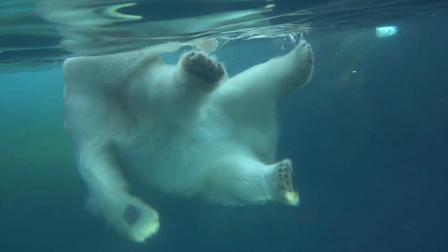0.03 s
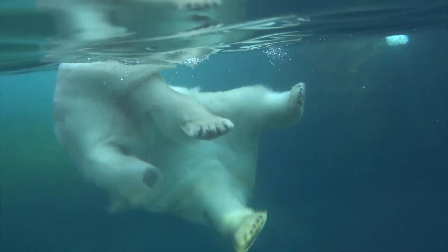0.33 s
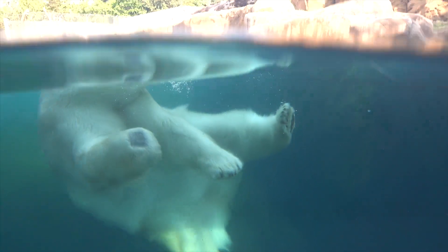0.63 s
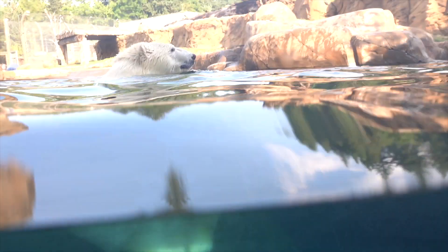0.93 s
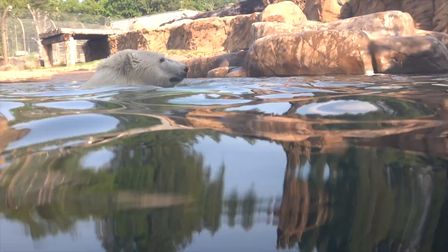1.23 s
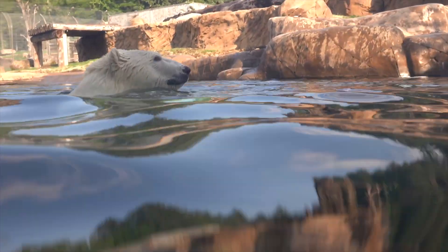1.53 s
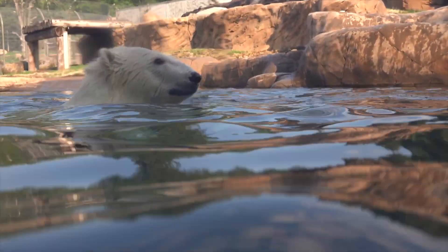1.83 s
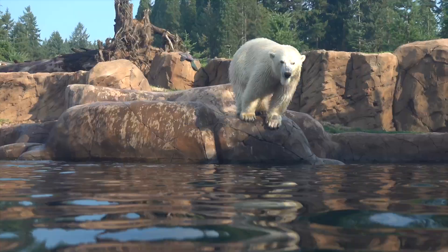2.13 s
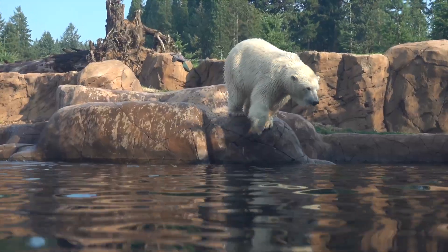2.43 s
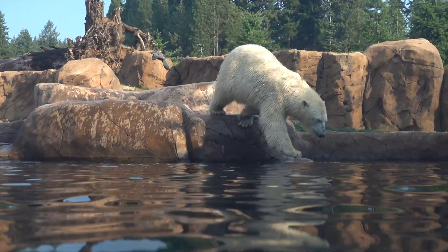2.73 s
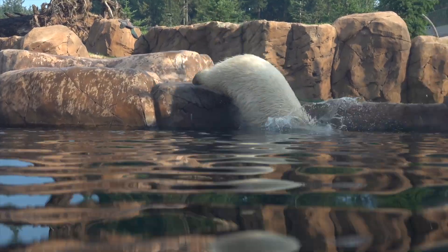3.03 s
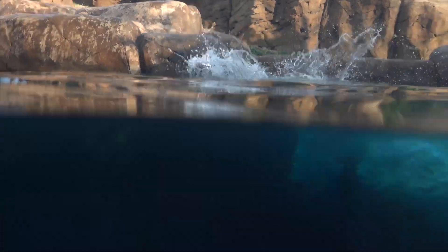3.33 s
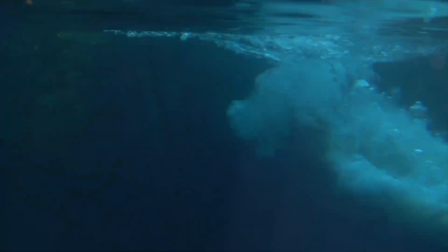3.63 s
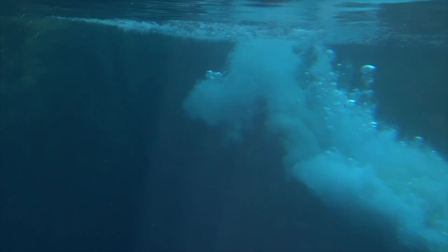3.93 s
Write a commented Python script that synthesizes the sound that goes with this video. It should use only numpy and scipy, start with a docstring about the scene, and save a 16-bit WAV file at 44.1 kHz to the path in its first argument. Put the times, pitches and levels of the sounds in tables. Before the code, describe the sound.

Water bubbles and splashes around a polar bear, heard at a pool's waterline. Soft underwater paddling with small pops fills the first second, leaving a dull, hollow wash. The bear blows faintly around 1.6 seconds, and the microphone housing knocks at 2.1. From 2.9 the bear plunges in: a drop ticks sharply at 3.1, then gulping bubbles, churn, fizz and spray surge, loudest around 3.7.

```python
"""Bubbly underwater paddling over the dull, hollow wash of a zoo pool, heard from inside a waterproof
housing at the waterline. A polar bear swims, surfaces and blows; bubbles pop and droplets tick.
The housing rings briefly twice, from a knock and from a hard drop. The bear dives in from the rocks:
surges of gulping air, churn, fizz and falling spray, each a cloud of ringing bubbles over noise."""
import sys
import numpy as np
from scipy import signal
from scipy.fft import rfft, irfft
from scipy.io import wavfile

SR = 44100
rng = np.random.default_rng(int(sys.argv[2]) if len(sys.argv) > 2 else 0)


def to_wav(sig):
    """Store sig (one row per channel, or 1-D mono) as 16-bit WAV at the path in sys.argv[1].

    Samples outside -1..1 are clipped; the rate is SR.
    """
    pcm = np.clip(np.atleast_2d(sig), -1, 1) * 32767
    pcm = np.round(pcm).astype(np.int16)
    wavfile.write(sys.argv[1], SR, pcm.T)  # frames by channels


N = 176400
T = np.arange(N) / SR
CUTOFF_HZ = 15700

# fine spray spectrum: freq_hz, density_db
SPRAY_SPECTRUM = [(2500, -25), (5000, -2.5), (6400, 0), (7700, -2.5), (10000, -2), (12800, 1), (14200, -7),
                  (16000, -16)]


def dive():
    """Each surge drives big gulps of air, churning bubbles, fizz and spray; surge powers add."""
    # forepaws, body, hind legs, slap, backwash, cavity closing, water falling back:
    # start_s, rise_s, fade_db_per_s, gulp_db, churn_db, fizz_db, spray_db
    surges = [(2.87, 0.11, 32, -60.5, -52, -58, -74), (2.97, 0.14, 25, -67, -58, -67, -61),
              (3.115, 0.067, 90, -51, -47, -57, -63), (3.25, 0.04, 33, -56, -47, -54, -57.5),
              (3.348, 0.013, 37, -57, -46.5, -48.5, -57.5), (3.42, 0.13, 13, -70, -55, -48.5, -58.5),
              (3.57, .052, 56, -46, -37.4, -43, -51), (3.66, 0.082, 79, -61, -46, -44.5, -47.5)]
    # large, medium and small bubbles: freq_hz, density_db
    gulp_spectrum = [(30, -56), (100, -13.5), (190, -5), (270, -1.5), (380, 3.5), (520, -4.5), (900, -35)]
    churn_spectrum = [(250, -41), (480, -7.5), (660, -1), (900, -2.5), (1150, -6.5), (1350, -7.5),
                      (1600, -12), (2100, -23), (4000, -43)]
    fizz_spectrum = [(800, -33), (1500, -0.5), (2300, 0), (3000, -4), (4300, -5), (5300, -13.5),
                     (8000, -14), (16000, -42)]
    # water parting round the chest: freq_hz, density_db
    entry_spectrum = [(700, -16), (1200, 0.5), (1800, 2), (2500, -4), (4000, -22), (6600, -28),
                      (7400, -7.5), (8300, -13), (10000, -15), (13000, -21), (16000, -36)]
    power = sum((from_db(levels_db)[:, None] * burst(start_s, rise_s, fade_db_per_s)) ** 2
                for start_s, rise_s, fade_db_per_s, *levels_db in surges)
    gulp, churn, fizz, spray = np.sqrt(power)
    gulp = gulp * bubbles(gulp_spectrum, 131, 467, per_s=300, cycles=9.9,
                          share=.5, flutter_db=.5, pan_db=-.7)
    churn = churn * bubbles(churn_spectrum, 477, 1830, per_s=900, cycles=12,
                            share=.51, flutter_db=.7, pan_db=-2)
    fizz = fizz * bubbles(fizz_spectrum, 1420, 5400, per_s=2000, cycles=12,
                          share=.54, flutter_db=.8, pan_db=1.5)
    spray = spray * bubbles(SPRAY_SPECTRUM, 4600, 15000, per_s=2500, cycles=5,
                            share=.44, flutter_db=.1, pan_db=1)
    entry = from_db(-54.5) * burst(2.87, rise_s=.09, fade_db_per_s=19) * wash(entry_spectrum, pan_db=1.5)
    slap = from_db(-48) * burst(3.356, rise_s=.005, fade_db_per_s=80) * hollow(2340, width_hz=340)
    return gulp + churn + fizz + spray + entry + slap


def spurts():
    """Sheets of water thrown up by the dive break into short showers."""
    # showers: start_s, level_db
    showers = [(2.886, -64), (2.948, -61.5), (3.03, -63), (3.165, -62), (3.273, -58), (3.356, -52),
               (3.74, -44), (3.97, -55)]
    # shower spectrum: freq_hz, density_db
    spectrum = [(1200, -20), (2500, 4), (4300, 2), (6400, -5), (7700, -1), (10000, -4), (13000, -2),
                (16000, -18)]
    flow = sum(from_db(db) * burst(start_s, rise_s=.006, fade_db_per_s=260) for start_s, db in showers)
    return flow * bubbles(spectrum, 2200, 15000, per_s=2500, cycles=6, share=.52, flutter_db=1, pan_db=4)


def paddling():
    """Paws under water stir bubbles, raise a hollow swirl and shed air."""
    # stroke strength: time_s, level_db
    strokes = [(0, -52), (.15, -52.5), (.31, -48.5), (.5, -49.5), (.68, -51.5), (.88, -51.5), (.97, -62),
               (1.1, -82)]
    # stirred bubbles and shed air: freq_hz, density_db
    stir_spectrum = [(30, -38), (60, -22), (130, -9), (220, -2), (480, -2), (780, 3.5), (1100, -1),
                     (1450, -9), (2200, -14.5), (3200, -23), (4700, -41), (12000, -60)]
    air_spectrum = [(900, -22), (1800, 5), (3000, 0), (4700, -19), (6000, -9), (7400, -9), (8800, -23),
                    (15000, -22)]
    stir = level(strokes) * bubbles(stir_spectrum, 142, 2770, per_s=1600, cycles=13,
                                    share=.27, flutter_db=0, pan_db=-1)
    swirl = from_db(-51.5) * swell(.084, width_s=.073) * hollow(790, width_hz=330)
    air = from_db(-65) * swell(.33, width_s=.16) * wash(air_spectrum)
    return stir + swirl + air


def blow():
    """The bear blows through its nose: a narrow band of air noise."""
    # breath spectrum: freq_hz, density_db
    spectrum = [(1100, -38), (1530, -20), (1740, 2), (2000, -7.5), (2400, -28.5), (4000, -26), (6000, -44)]
    return from_db(-60) * burst(1.39, rise_s=.25, fade_db_per_s=33) * wash(spectrum, pan_db=9.5)


def knock(start_s=2.0882, rub_s=.0008):
    """A hit and a gritty rub ring the housing, which rattles and settles with a low thump."""
    # housing modes: freq_hz, gain_db, t60_s, pan_db
    modes = [(1070, -8, .02, -2), (1650, -9.5, 0.023, -7), (2370, -7, 0.0078, -6), (3270, 1.5, .0055, -7.5),
             (5560, -10, 0.0018, -6), (7970, 1, 0.0046, -2), (10500, -2.5, 0.0027, -3),
             (12200, -3, .002, 1)]
    # settling thump: freq_hz, density_db
    thump_spectrum = [(15, -16), (40, -5), (150, -2), (350, 0), (700, -20), (2000, -50)]
    grit = rng.standard_normal((2, N)) * swell(start_s + rub_s, rub_s)
    grit /= np.sqrt(np.sum(grit ** 2, axis=1, keepdims=True))   # unit energy, like the click
    force = click(start_s) + from_db(6) * spread(grit)
    tick = from_db(-31) * strike(force, modes, low_hz=700, high_hz=CUTOFF_HZ)
    rattle = from_db(-51) * burst(start_s, rise_s=.008, fade_db_per_s=750) * hollow(3370, width_hz=1000)
    settling = from_db(-57) * burst(2.098, rise_s=.0033, fade_db_per_s=1100)
    return tick + rattle * pan(-3) + settling * wash(thump_spectrum, pan_db=-2.5)


def drop(start_s=3.1036):
    """A hard drop hits the housing with a sharp tick and shatters into spray."""
    # wall modes: freq_hz, gain_db, t60_s, pan_db
    wall_modes = [(2950, -12, 0.0055, 3), (3670, -15.5, .004, 9), (5600, -14, 0.0026, 2),
                  (7300, -5, 0.0021, 6), (8600, -6, .003, 4), (9500, -38, 0.032, 0),
                  (10540, 1.5, 0.0023, -1), (13400, -4, .0015, 0)]
    # wall antiresonances: freq_hz, width_hz
    notches = [(4400, 1200), (9450, 170)]
    # brief, faint low bump of pool water under the tick: freq_hz, level_db, t60_s
    bump_tones = [(215, -45, 0.04), (780, -32, .012)]
    hit = click(start_s)
    tick = strike(hit, wall_modes, low_hz=2510, high_hz=13600)
    for hz, width_hz in notches:
        tick = signal.lfilter(*signal.iirnotch(hz, hz / width_hz, fs=SR), tick)
    water_bump = sum(from_db(db) * ring(hit, hz, t60_s) for hz, db, t60_s in bump_tones)
    shatter = from_db(-36.5) * burst(start_s, rise_s=.0011, fade_db_per_s=2800) * wash(SPRAY_SPECTRUM)
    return from_db(-5) * lag_left(tick, lag_s=7e-6) + water_bump + shatter


def surfacing():
    """Bubbles burst and water gurgles as the housing rises."""
    # bursting bubbles: start_s, pitch_hz, level_db
    bursts = [(.652, 1900, -56), (.803, 1750, -55.5), (.886, 1950, -55), (.918, 1730, -50.5)]
    pops = sum(from_db(db) * burst(start_s, rise_s=.002, fade_db_per_s=900) * hollow(hz, width_hz=650)
               for start_s, hz, db in bursts)
    gurgle = from_db(-60) * swell(.75, width_s=.08) * hollow(170, width_hz=165)
    return pops + gurgle


def drips():
    """Droplets tick faintly on the housing as it bobs at the waterline."""
    # droplets: start_s, pitch_hz, level_db
    droplets = [(.609, 4000, -67), (.649, 4800, -66), (.885, 10500, -69), (.928, 7000, -66),
                (1.518, 11000, -68), (1.612, 4000, -66)]
    return sum(from_db(db) * burst(start_s, rise_s=.001, fade_db_per_s=1900) * hollow(hz, width_hz=3500)
               for start_s, hz, db in droplets)


def running_water(surface_s=.92, move_s=2.089, submerged_db=-2.5):
    """The pool's wash: quieter under water, louder opposite the rocks; a thin sizzle after the knock."""
    # wash at mid-pool and opposite the rocks: freq_hz, density_db
    mid_pool_spectrum = [(18, -61), (30, -38), (48, -27), (124, -14), (161, -10), (215, -10), (303, -10),
                         (345, -10), (449, -7), (584, -6), (962, 1), (1390, -14.8), (2170, -21.5),
                         (4300, -29), (6050, -30), (8300, -29.5), (16000, -39)]
    rocks_spectrum = [(18, -84), (30, -52), (64, -32), (90, -25.5), (161, -12.5), (311, -9), (404, -13),
                      (600, -2.5), (889, -1), (1160, -4), (1670, -21), (3060, -26.5), (3310, -31),
                      (3980, -31.5), (4780, -39), (5400, -35.5), (5850, -29), (6720, -36), (7470, -31),
                      (9220, -39), (11100, -38.5), (16000, -52)]
    # wash strength opposite the rocks: time_s, level_db
    rocks_level = [(2.09, -49), (2.25, -47.5), (2.5, -47.5), (2.8, -48), (3.2, -45.5), (4, -44.5)]
    mid_pool = from_db(-54 + submerged_db * (T < surface_s)) * wash(mid_pool_spectrum, pan_db=-.1)
    sizzle = from_db(-68) * burst(2.1, rise_s=.01, fade_db_per_s=22) * hollow(7500, width_hz=700)
    by_rocks = level(rocks_level) * wash(rocks_spectrum, pan_db=.26)
    return np.where(T < move_s, mid_pool, by_rocks) + sizzle


def bubbles(spectrum, low_hz, high_hz, per_s, cycles, share, flutter_db, pan_db, pitch_count=24):
    """Random bubbles ring down 60 dB in `cycles`; they carry `share` of the power, a wash the rest."""
    sizes = from_db(3.8 * np.minimum(rng.exponential(1, N), 3.5)) * rng.choice([-1, 1], (2, N))
    born = rng.random(N) < per_s / SR
    pitch_index = rng.integers(0, pitch_count, N)
    rings = sum(hz * ring(sizes * (born & (pitch_index == k)), hz, cycles / hz)
                for k, hz in enumerate(np.geomspace(low_hz, high_hz, pitch_count)))
    distinct = spread(unit_rms(colour(rings, spectrum)), pan_db)
    cloud = np.sqrt(share) * distinct + np.sqrt(1 - share) * wash(spectrum, pan_db)
    return cloud * from_db(flutter_db * drift(per_s=110))


def strike(force, modes, low_hz, high_hz):
    """A force rings the housing's panned modes; the small wall passes no bass."""
    ringing = sum(from_db(db) * ring(force, hz, t60_s) * pan(pan_db) for hz, db, t60_s, pan_db in modes)
    return signal.sosfilt(signal.butter(2, [low_hz, high_hz], "band", fs=SR, output="sos"), ringing)


def hollow(hz, width_hz):
    """Stereo noise twice through one resonance."""
    t60_s = np.log(1000) / (np.pi * width_hz)
    once = ring(rng.standard_normal((2, N)), hz, t60_s)
    return spread(unit_rms(ring(once, hz, t60_s)))


def wash(spectrum, pan_db=0):
    """Noise of water or air, too dense for single bubbles to show."""
    return spread(unit_rms(colour(rng.standard_normal((2, N)), spectrum)), pan_db)


def ring(x, hz, t60_s):
    """One mode: a unit click starts a decaying wave of height 1."""
    radius = from_db(-60 / (t60_s * SR))
    angle = 2 * np.pi * hz / SR
    return signal.lfilter([.5, 0, -.5], [1, -2 * radius * np.cos(angle), radius ** 2], x + 1e-18)


def click(start_s):
    """Unit impulse."""
    hit = np.zeros(N)
    hit[int(start_s * SR)] = 1
    return hit


def burst(start_s, rise_s, fade_db_per_s):
    """Smooth rise, then exponential fade."""
    rise = np.sin(np.pi / 2 * np.clip((T - start_s) / rise_s, 0, 1)) ** 2
    return rise * from_db(-fade_db_per_s * np.maximum(T - start_s - rise_s, 0))


def swell(centre_s, width_s):
    """Gaussian envelope."""
    return np.exp(-.5 * ((T - centre_s) / width_s) ** 2)


def level(points):
    """Gain curve through (time_s, level_db) points."""
    return from_db(np.interp(T, *np.transpose(points)))


def drift(per_s):
    """Random curve through unit-variance knots."""
    knots = rng.standard_normal(4000)
    return np.interp(T * per_s, np.arange(len(knots)), knots)


def colour(x, spectrum):
    """Filter by (freq_hz, gain_db) points."""
    hz, db = np.transpose(spectrum)
    bins_hz = np.maximum(np.arange(N // 2 + 1) * SR / N, 1)
    return irfft(rfft(x) * from_db(np.interp(np.log(bins_hz), np.log(hz), db)), N)


def spread(pair, pan_db=0):
    """Two unrelated signals as mid and side: narrow bass, wide treble."""
    # stereo width: freq_hz, side_minus_mid_db
    width = [(60, -35), (150, -36.5), (380, -16), (950, -10.5), (2400, -6), (6000, -1.5), (15000, -7)]
    mid, side = pair
    return (mid + colour(side, width) * [[1], [-1]]) * pan(pan_db)


def pan(db):
    """Channel gains for a left-minus-right level."""
    return from_db(np.array([[.5], [-.5]]) * db)


def lag_left(pair, lag_s):
    """Sub-sample delay of the left channel."""
    hz = np.arange(N // 2 + 1) * SR / N
    left = irfft(rfft(pair[0]) * np.exp(-2j * np.pi * hz * lag_s), N)
    return np.array([left, pair[1]])


def from_db(db):
    """Decibels to gain."""
    return 10 ** (np.asarray(db) / 20)


def unit_rms(x):
    """Scale to unit power."""
    return x / np.sqrt(np.mean(x ** 2) + 1e-20)


def scene():
    """Pool, bear and housing, summed in stereo."""
    return running_water() + paddling() + surfacing() + blow() + drips() + dive() + spurts() + knock() + drop()


def record(dry):
    """Steep elliptic low-pass."""
    return signal.sosfilt(signal.ellip(10, .1, 80, CUTOFF_HZ, fs=SR, output="sos"), dry)


dry = scene()
out = record(dry)
to_wav(out)
```